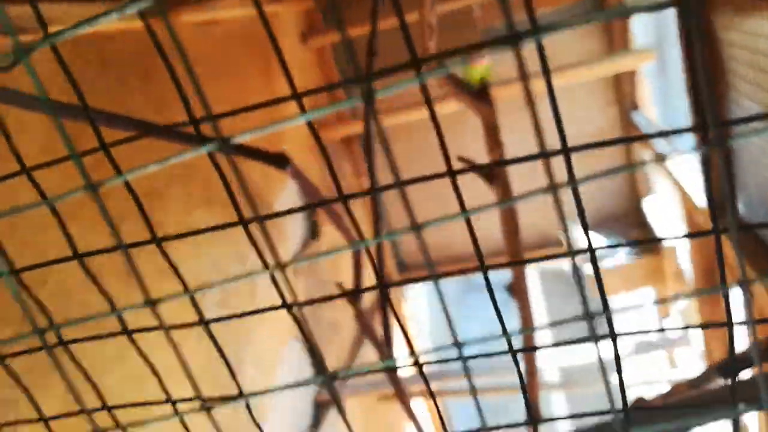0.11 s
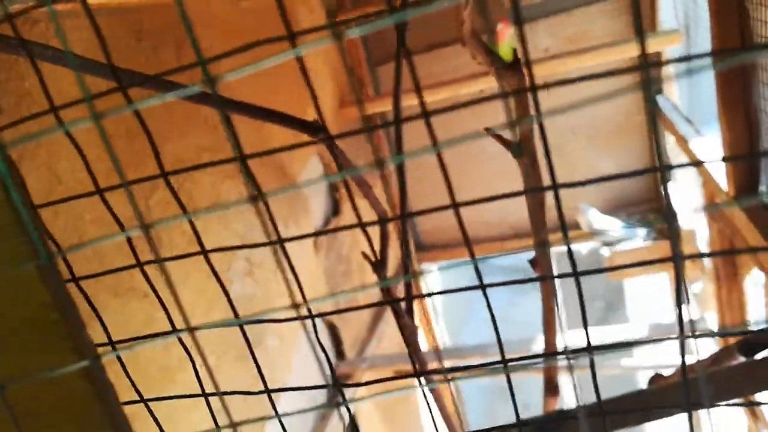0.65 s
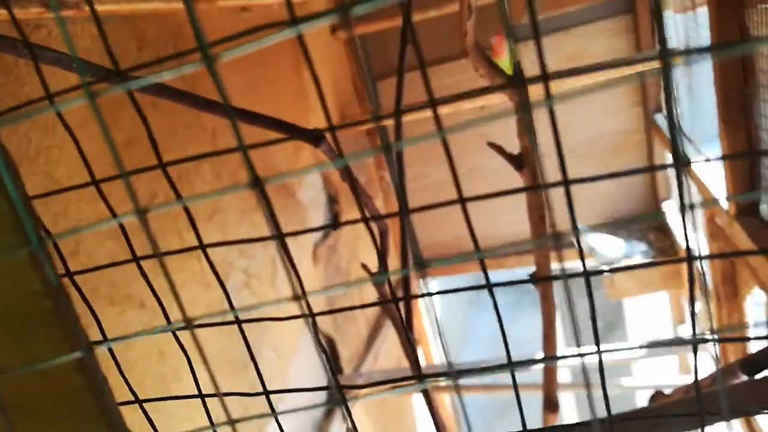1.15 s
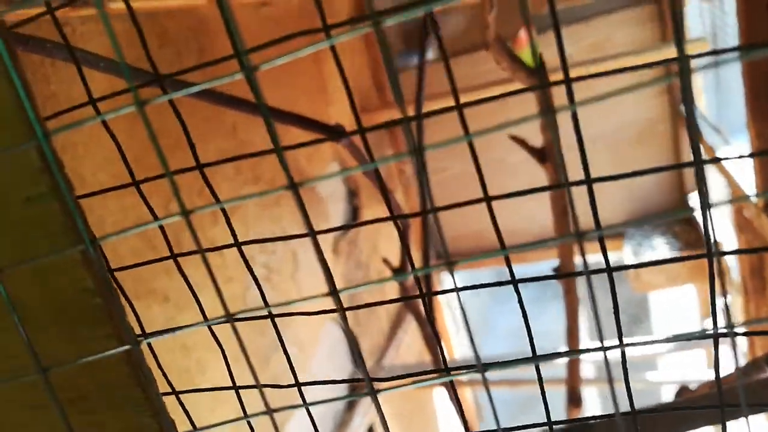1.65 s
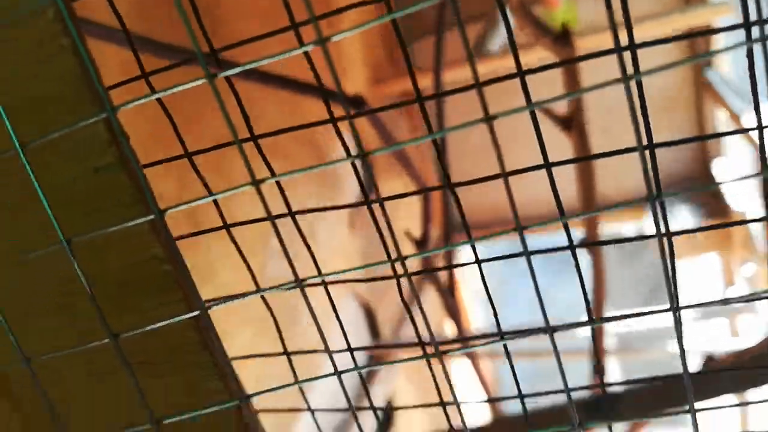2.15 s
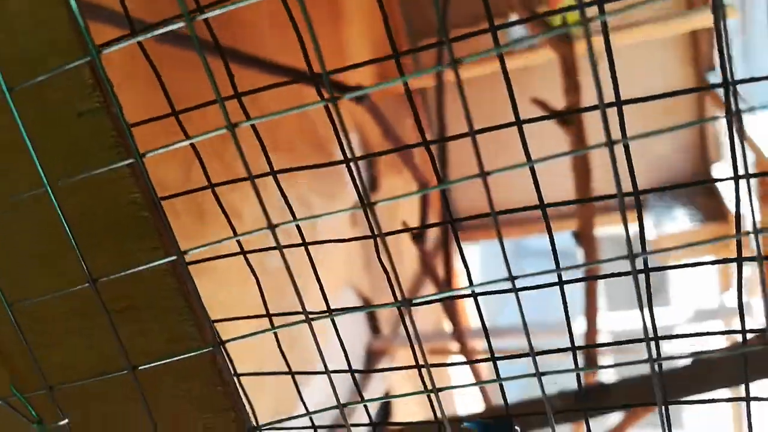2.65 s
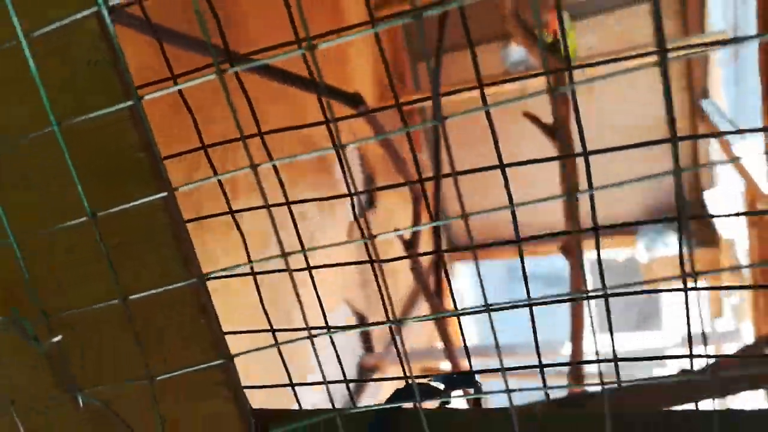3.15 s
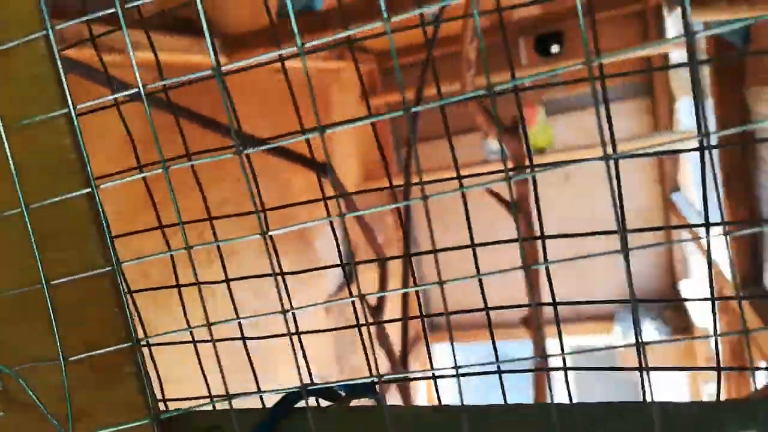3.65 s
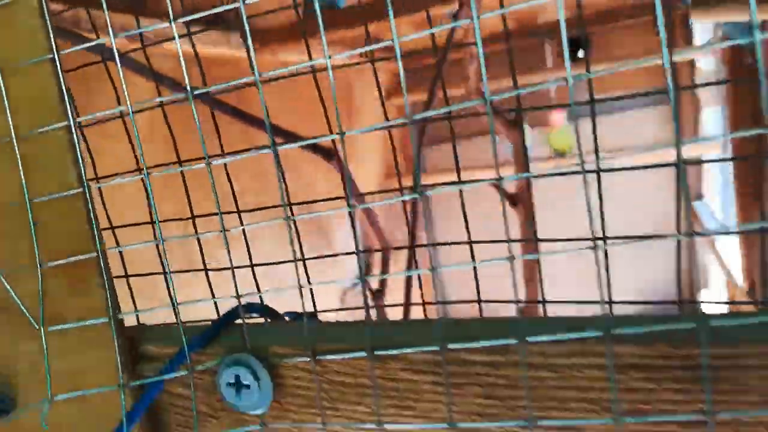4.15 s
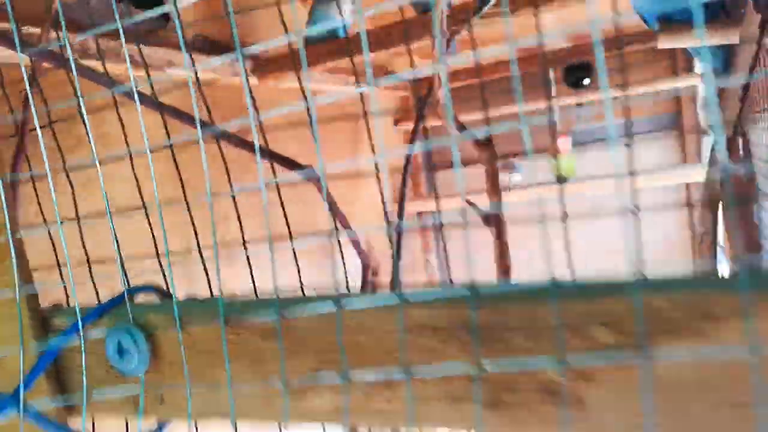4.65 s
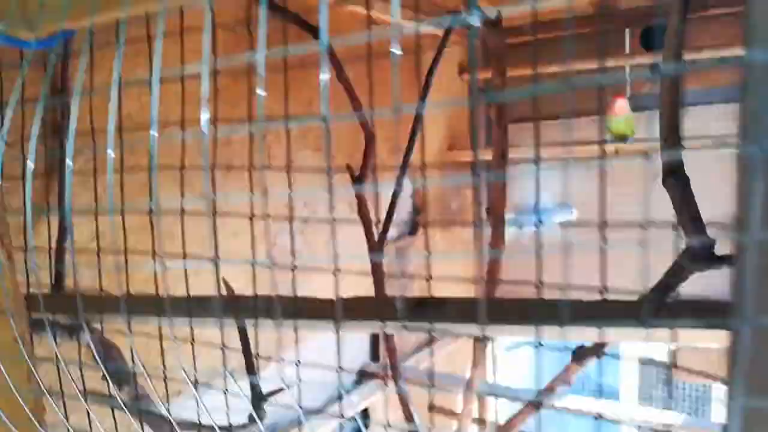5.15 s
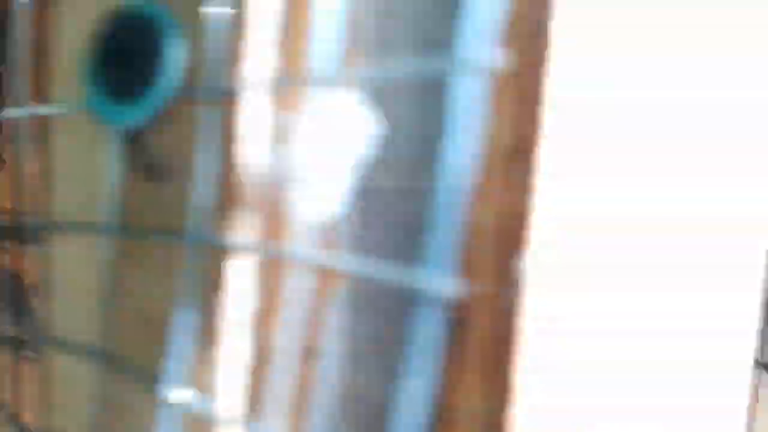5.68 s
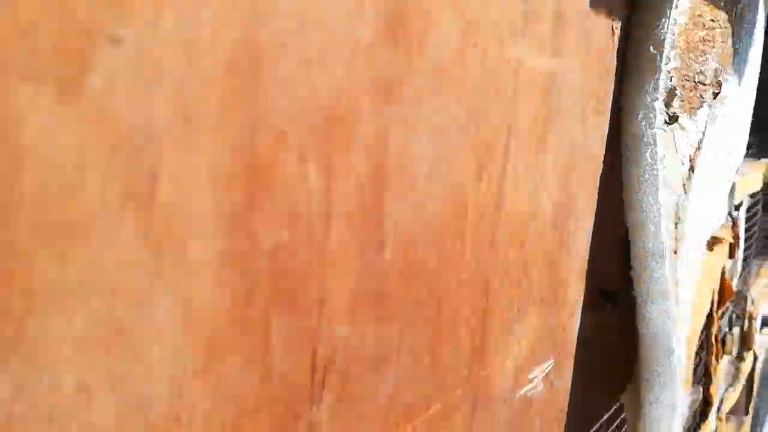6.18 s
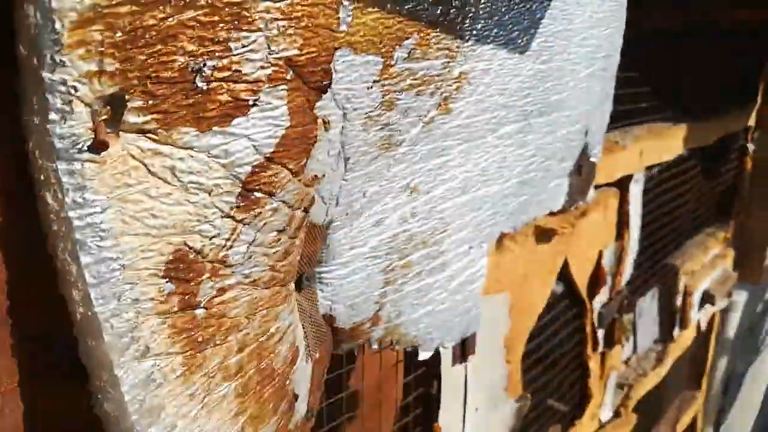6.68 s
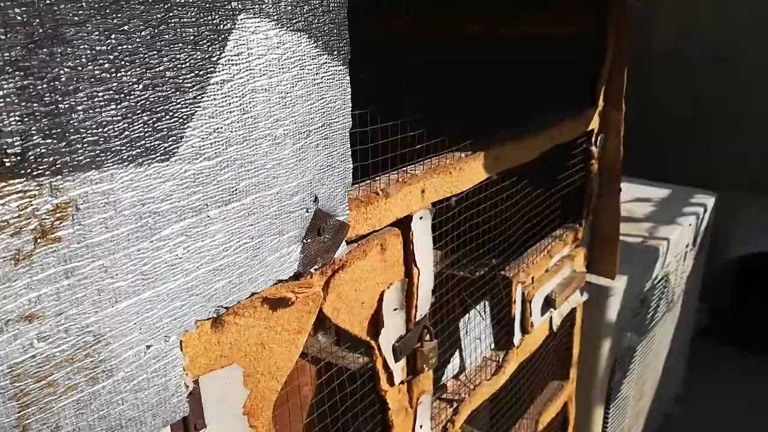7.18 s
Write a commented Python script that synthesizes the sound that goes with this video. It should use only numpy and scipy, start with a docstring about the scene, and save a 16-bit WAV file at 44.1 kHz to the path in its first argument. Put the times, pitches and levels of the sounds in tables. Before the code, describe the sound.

A quiet wood and wire aviary heard through a close hand-held stereo microphone. At 0 s wire mesh jingles briefly under cloth rustle, with a sharp tick. Light clicks and knocks come at 0.4 s; a lively cluster of hard, bright claw ticks, mostly left, runs from 1.0 to 1.3 s, with a low bump. At 1.5 s a loud squeaky parrot chirp flicks up into a piercing high note; a weaker squeak and another chirp follow by 1.8 s. From 2 to 3.5 s it is sparse: faint thin whistles near 2.4 s, small ticks, a finger rub left. Hand rustle and wood scraping swell from 4 to 5.3 s, with a knock at 4.5 s. Chirps return left at 5.25 and 5.4 s, then nearer centre at 5.75 and 5.95 s, the last shrillest. Short echoes fade; a knock at 6.4 s, a soft hiss, tiny ticks and near quiet until 7.3 s.

```python
"""A wood and wire aviary: small parrots chirp close to a hand-held camera with two spaced microphones.
Chirps are sums of fluttering harmonics shaped by a throat response; struck wires are decaying modes.
Claws and fingers tick as short filtered noise, and wood knocks as decaying sines. Cloth, wood, skin, the
quiet yard and low bumps of the hand are coloured noise; hums and distant whistles are narrow bands.
Calls, ticks, knocks and wires also excite sparse echoes from boards and boxes."""
import sys
import numpy as np
from scipy import signal
from scipy.io import wavfile
from scipy.ndimage import uniform_filter1d

SR = 44100
rng = np.random.default_rng(int(sys.argv[2]) if len(sys.argv) > 2 else 0)


def output_pcm(signal):
    """Save a mono or channel-first signal as 16-bit PCM at the path in sys.argv[1].

    Samples are clipped to [-1, 1] before scaling.
    """
    pcm = np.clip(np.atleast_2d(signal).T, -1, 1) * 32767
    wavfile.write(sys.argv[1], SR, np.round(pcm).astype(np.int16))


def nominal_scale(level):
    """Amplitude ratio for a level in decibels (scalar or array-like)."""
    x = np.asarray(level, float) / 20
    return 10 ** x


N = 321930

# Short syrinx notes, often two at once from its two sides: (t/s, length/s, initial f/Hz, target f/Hz, effort/dB)
SHORT_NOTES = [(1.53, 0.031, 7070, 6950, -10), (1.531, 0.026, 5020, 5860, -14),
               (1.548, .042, 3520, 3830, -26.5), (1.723, .02, 3507, 3720, -19.5),
               (1.738, 0.035, 1976, 1993, -25), (1.81, .011, 6810, 6710, -12),
               (1.821, 0.021, 6375, 6930, -8.5), (1.807, 0.015, 4560, 5850, -22),
               (5.291, .018, 5240, 5466, -11), (5.306, .013, 5400, 6000, -10),
               (5.309, 0.022, 7020, 6800, -22), (5.381, 0.011, 1970, 1960, -28),
               (5.408, .012, 4726, 5170, -9.5), (5.411, 0.026, 6760, 6310, -11.5),
               (5.799, .029, 6830, 6780, -11), (5.807, 0.042, 4980, 5860, -19),
               (5.921, 0.024, 2600, 2730, -20.5), (5.988, 0.029, 6740, 6710, -2.5),
               (5.989, .032, 2953, 2935, -28.5), (6.015, .024, 3000, 3630, -28)]
# Long squeak of each chirp, a list of points: (t/s, f/Hz, effort/dB, roughness/1)
SQUEAK_CONTOURS = [
    [(1.4755, 2030, -24.5, .6), (1.482, 2060, -13, .6), (1.492, 2130, -13, .7), (1.503, 2170, -10.5, .05),
     (1.52, 2283, -6, 0.05), (1.532, 2325, -12, 0)],
    [(1.672, 1600, -35, .5), (1.681, 1743, -27.5, .3), (1.695, 1785, -31.5, .15), (1.705, 1800, -26, .3),
     (1.716, 1690, -46, .4)],
    [(1.759, 2365, -19, .5), (1.765, 2412, -15, 0.1), (1.772, 2077, -11.5, .05), (1.782, 2190, -12.5, .05),
     (1.792, 2260, -19, 0), (1.805, 2330, -14.5, .05), (1.817, 2343, -15, 0)],
    [(5.251, 2088, -27.5, .9), (5.259, 2490, -19.5, .4), (5.267, 2420, -16, .3), (5.276, 2207, -17, .05),
     (5.287, 2337, -16.5, .05), (5.298, 2337, -25, 0)],
    [(5.381, 2658, -31, .2), (5.39, 2642, -19.5, 0), (5.402, 2713, -16, 0), (5.409, 2760, -21.5, .05),
     (5.417, 3070, -33.5, .1)],
    [(5.736, 1930, -29, .4), (5.744, 2038, -17.5, 0.1), (5.756, 2030, -10.5, 0.01),
     (5.768, 2170, -15.5, .05), (5.782, 2203, -16.5, 0.11), (5.792, 2282, -15.5, .05),
     (5.802, 2390, -18, .2)],
    [(5.919, 2054, -28, .6), (5.933, 2220, -19.5, .2), (5.945, 2320, -11, .05), (5.958, 2380, -12.5, 0),
     (5.97, 2310, -13.5, .05), (5.98, 2240, -12.5, .05), (5.988, 2160, -23.5, .05)],
]
# Seat of the bird of each chirp: (from t/s, left minus right level/dB)
PERCH_SIDES = [(1.47, 0.5), (1.66, 5.5), (5.24, 12.5), (5.37, 9), (5.72, 4.5), (5.9, 2.5)]
# Throat response, before the harmonics are normalised: (f/Hz, level/dB)
THROAT_RESPONSE = [(1700, -15), (2300, -16.5), (2800, -8), (3700, -10), (5000, -6), (6700, 2),
                   (7600, -11.5), (9000, -14.5), (10100, -26), (11500, -22), (14000, -38)]
# Decay of the echoes off boards and boxes: (f/Hz, t60/s)
ECHO_DECAY = [(1500, 0.081), (2500, 0.24), (4500, 0.14), (6800, 0.17), (9000, 0.11), (13000, 0.12)]
# Ticks of claws and fingers: (t/s, peak level/dB, ring f/Hz, left minus right level/dB, t60/s)
TICK_EVENTS = [(0.0585, -15.5, 7000, -3.5, .048), (.4043, -34.5, 4500, 7.5, .015),
               (.4154, -33, 4570, 1.5, .024), (0.5177, -40.5, 2400, 7.5, .009),
               (.9773, -25.5, 1310, 5.5, .049), (0.9871, -11, 5300, 9.5, .028),
               (1.0162, -21.5, 6900, 4.5, .012), (1.04, -13.5, 3750, 7, .021),
               (1.071, -32, 3580, -1.5, .016), (1.1161, -23.5, 5970, 7, .033), (1.1354, -29, 6200, 4, .026),
               (1.2407, -37, 3010, 3.5, .035), (1.262, -31.5, 5820, 5.5, .037),
               (1.4488, -37, 4340, 9, .026), (2.296, -29.5, 4230, 7, .007), (2.344, -41.5, 6900, 6, .02),
               (2.4196, -37.5, 6590, -0.5, .007), (2.4746, -42, 5500, -0.5, .007),
               (3.056, -35.5, 4980, 0, .007), (3.0991, -27.5, 6000, -1.5, .007),
               (3.1864, -27.5, 1270, 13.5, .005), (3.244, -28.5, 5550, -0.5, .007),
               (3.4775, -43.5, 1040, -10, .02), (3.599, -26, 7700, 20, .006), (3.628, -35.5, 1110, 0, .007),
               (3.7197, -37.5, 1096, -6.5, .004), (4.4689, -25.5, 1210, 1.5, .012),
               (4.596, -24.5, 5750, -2.5, .007), (5.538, -47, 7800, 0, 0.0055),
               (5.5645, -34.5, 6390, 4, .007), (5.609, -40, 7800, 0.5, .006),
               (5.669, -40.5, 7800, -3.5, .006), (5.703, -38, 7800, -3.5, .006),
               (5.915, -38, 7770, 1, .006), (5.6355, -37, 5750, -13.5, .007),
               (6.3024, -35, 6430, 8.5, .006), (6.4156, -27, 1330, 6.5, .007),
               (6.7312, -36, 7140, 6.5, .025), (6.8059, -35, 4050, -1.5, .014),
               (6.9352, -40.5, 7060, 2.5, .019), (7.0766, -40.5, 1220, 20.5, .024),
               (7.113, -41.5, 3520, 4.5, .007), (7.14, -45.5, 700, 6, .015),
               (7.2579, -45.5, 1272, -12.5, .022)]
# Modes of three wire panels, by name; mesh() caps the decay at 0.2 s: (f/Hz, level/dB, t60/s)
PANEL_MODES = {"thin": [(5190, -.1, 0.25)], "stiff": [(2654, 2.5, 0.15), (3500, -3.5, 0.15),
               (4230, -19, 0.09), (6740, -11.5, 0.06)], "loose": [(1330, -7, 0.11), (1586, 0.5, 0.1),
               (1910, -8, 0.11), (2610, 2, 0.04), (3000, -8, 0.061), (3150, 6.5, 0.052), (3580, 2, 0.058),
               (4360, -10, 0.073), (5750, -22, .025), (6780, 5, 0.057), (7650, 4.5, 0.06),
               (8340, -6.5, 0.027), (8314, -4.5, 0.037)]}
# Birds shake the mesh: (t/s, panel, 1/e time of shaking/s, level/dB, left minus right level/dB)
MESH_SHAKES = [(.001, "thin", 0.0031, -39, -3), (0.024, "stiff", 0.0099, -32.5, -9.5),
               (.059, "loose", 0.033, -36.5, -0.5), (0.097, "loose", 0.039, -35.5, -1),
               (0.128, "loose", 0.045, -47, 1)]
# Relative spectrum of the hiss of cloth: (f/Hz, level per Hz/dB)
CLOTH_SPECTRUM = [(1180, -14), (2000, -10), (2570, -5.5), (5350, -1), (6880, -2), (8190, -4), (10300, -17),
                  (14500, -26), (16000, -40)]
# Relative spectrum of the scrape of wood: (f/Hz, level per Hz/dB)
WOOD_SPECTRUM = [(180, -16.5), (300, 1.5), (455, -9), (539, -2.5), (599, 1.5), (959, -1), (2500, -10.5),
                 (3250, -38.5), (5500, -120)]
# Relative spectrum of the camera body under the hand: (f/Hz, level per Hz/dB)
BODY_SPECTRUM = [(12, -37), (20, -4.5), (60, 5), (92, -4.5), (123, -0.5), (206, -7.5), (252, -7),
                 (400, -27), (520, -54), (880, -120)]
# Relative spectrum of the quiet yard: (f/Hz, level per Hz/dB)
YARD_SPECTRUM = [(180, -30), (300, -2), (511, -5), (900, -2), (2400, -9), (6740, -6.5), (8090, -12.5),
                 (10400, -24), (14700, -26), (16000, -32.5)]
# Diffuse sound at the two microphones: (f/Hz, likeness/1)
COHERENCE = [(60, 0.99), (130, 1), (290, 0.55), (640, -0.49), (1410, -0.07), (3100, 0.0038), (6820, 0.0018),
             (15000, 0.14)]
# A finger rubs the casing by the left microphone: (full from t/s, until t/s, level/dB, left minus right level/dB)
FINGER_RUBS = [(3.206, 3.217, -52, 17), (3.321, 3.369, -44.5, 20.5), (7.002, 7.078, -57.5, 10.5)]
# Relative spectrum of skin on the casing: (f/Hz, level per Hz/dB)
SKIN_SPECTRUM = [(290, -50.5), (500, -27), (974, -3), (1210, -1.5), (1600, -0.5), (2460, -9.5), (3020, -6),
                 (4470, -11), (7000, -6.5), (16000, -39)]
# Swells of each of two hums over its resting level: (full from t/s, until t/s, level/dB)
HUM_SWELLS = [
    [(.0, .03, -55), (.6, .85, -59.5), (1.33, 1.38, -53.5), (1.65, 2.6, -58.5), (3.08, 3.18, -51),
     (3.7, 3.92, -48), (4.55, 4.9, -64), (5.2, 5.4, -50)],
    [(1.25, 1.4, -52.5), (3.58, 3.93, -51.5), (4.4, 4.9, -59), (5.3, 5.45, -51.5), (6.6, 7.2, -62.5)],
]
# Bands of the two hums: (centre f/Hz, width/Hz)
HUM_BANDS = [(75, 2.7), (125, 8.8)]
# Resting level of each hum: level/dB
HUM_REST = [-66, -78]
# Tones and whistles from far off: (start t/s, end t/s, f/Hz, width/Hz, peak level of the steady core/dB)
DISTANT_TONES = [(.001, 0.42, 239.5, 9.3, -60.5), (.05, 0.18, 564, 17, -64.5),
                 (1.127, 1.194, 1400, 26, -61), (2.21, 2.295, 1370, 39, -62), (2.23, 2.29, 3130, 67, -58),
                 (2.355, 2.413, 3140, 30, -50), (2.355, 2.475, 4860, 57, -55.5),
                 (2.37, 2.434, 5700, 40, -61), (6.044, 6.063, 2650, 60, -36),
                 (6.14, 6.437, 1630, 40, -69.5), (6.779, 7.3, 1238, 50, -70.5)]
# Dull knocks on wood: (t/s, peak level/dB, f/Hz)
WOOD_KNOCKS = [(0.4048, -36, 265), (0.4162, -35.5, 260), (.98, -35, 830), (1.0177, -33.5, 253),
               (1.1165, -38, 262), (1.262, -34, 834), (1.4481, -37, 760), (3.614, -40, 270),
               (4.061, -36.5, 201), (4.4676, -27.5, 260), (4.595, -43, 260), (6.4153, -33.5, 277)]
# Hands and cloth move: (full from t/s, until t/s, level/dB, weight on the wood/dB, left minus right level/dB)
HAND_MOVES = [(.0, 0.11, -39, -9, -2), (0.392, 0.429, -52.5, -5.5, 1), (0.52, 0.69, -46.5, -5.5, 4),
              (0.871, 0.918, -52.5, -8, 0), (1.003, 1.033, -52.5, 3.5, 4.5), (1.13, 1.122, -59, 10.5, 5),
              (1.264, 1.302, -49.5, -1, 0.5), (1.337, 1.35, -47, -6.5, 1.5), (1.477, 1.534, -53, 4, 3),
              (1.757, 1.8, -60.5, 4.5, -1), (2.11, 2.124, -58, -4, 2.5), (2.253, 2.33, -56.5, 0.5, 2),
              (2.377, 2.462, -55, -10.5, -0.5), (2.564, 2.57, -57.5, -2.5, 0), (2.69, 2.7, -68, -9, -7),
              (2.895, 3.112, -52.5, -1, -0.5), (3.178, 3.37, -55.5, 0, -2), (3.464, 3.582, -55.5, 2, 2.5),
              (3.588, 4.01, -48.5, -2, 0), (4.042, 4.436, -39, -1, -0.5), (4.442, 4.577, -45, 1, -1),
              (4.606, 4.929, -43, -1.5, 2), (4.974, 5.267, -42, -5.5, 3), (5.315, 5.672, -52.5, -4.5, -1),
              (5.705, 5.72, -44.5, -4, -3), (5.856, 5.923, -46.5, -12.5, -1.5), (6.034, 6.07, -46, -4, 1),
              (6.141, 6.4, -57.5, -7, -1.5), (6.453, 6.627, -44, -26.5, 0.5),
              (6.65, 6.688, -51.5, -27, 1.5), (7.027, 7.067, -68.5, 15.5, 10), (7.167, 7.2, -57, -14, 6.5)]
# The hand bumps the camera body: (full from t/s, until t/s, level/dB)
BODY_BUMPS = [(0.066, 0.16, -48.5), (0.41, 0.456, -48.5), (1.279, 1.335, -36), (1.472, 1.537, -46),
              (1.748, 1.8, -56.5), (2.556, 2.584, -55), (2.946, 3.254, -53.5), (4.036, 4.08, -45),
              (4.12, 4.54, -48), (4.777, 4.802, -45), (5.033, 5.065, -52), (5.2, 5.25, -38.5),
              (5.303, 5.393, -53), (5.515, 5.527, -45), (5.711, 5.757, -45.5), (6.398, 6.436, -55),
              (6.558, 6.585, -55.5)]

SPACING = 27  # samples between the microphones for sound from the side
YARD_DB = -61
MOVE_RISE_DB_PER_S, MOVE_FALL_DB_PER_S = 255, 260
BUMP_DB_PER_S = 298.5
GRIP_DB, GRIP_FADES_DB_PER_S = -56, 0.5  # the steady grip rumbles a little, less and less
RUB_RISE_DB_PER_S, RUB_FALL_DB_PER_S = 308, 700
HUM_DB_PER_S = 64.5
KNOCK_T60_S = .035
FAINT_TICKS, FAINT_DB, FAINT_SPREAD_DB = 50, -57, 3  # small claw ticks at random moments
FAINT_LOW_HZ, FAINT_HIGH_HZ = 3000, 7500
ECHO_ABOVE_HZ = 3200  # the boards throw back less of the low partials of calls
RISE_S, START_DB, FADE_DB = 0.0085, -2.5, -17  # a short note swells, then dies
GLIDE = .4  # time constant of the pitch, as a share of the note's length
RASP, RASP_S, RASP_REST = .6, 0.0045, .05  # a short note starts rough and clears
SQUEAK_BASE_DB, NOTE_BASE_DB = -1, 4.5  # lift of the lowest partial
BASE_DB_PER_KHZ = 14  # further lift in squeaks of mean pitch above 2150 Hz


def evened(x):
    """Normalisation: scales a signal to unit rms."""
    return x / np.sqrt(np.mean(abs(x) ** 2) + 1e-20)


def read(points, hz):
    """Logarithmic interpolation: reads a spectrum on a log-frequency axis."""
    f, value = np.transpose(points)
    return np.interp(np.log(hz + 1), np.log(f + 1), value)


def lowpass(x, order, hz):
    """Low-pass filtering: keeps the slow part of a fluctuation."""
    return signal.sosfilt(signal.butter(order, hz, fs=SR, output="sos"), x)


def bandpass(x, order, band):
    """Band-pass filtering: keeps the part between two frequencies in Hz."""
    return signal.sosfilt(signal.butter(order, band, "bandpass", fs=SR, output="sos"), x)


def add(mix, s, sound, pan_db):
    """Interaural cues: level and delay place one or two channels; the far microphone hears later."""
    late = round(SPACING * np.clip(pan_db / 6, -1, 1))
    pair = sound * np.ones((2, 1))
    for side, sign in enumerate((1, -1)):
        start = round(s * SR) + max(-sign * late, 0)
        part = mix[side, start:][:pair.shape[1]]
        part += nominal_scale(sign * pan_db / 2) * pair[side, :len(part)]


def swells(start, end, level_db, rise, fall):
    """Exponential envelopes: the power of each event climbs, holds and sinks at set dB per second."""
    s = np.arange(0, N / SR + .01, .002)
    before_db = (start[:, None] - s) * rise
    after_db = (s - end[:, None]) * fall
    short_db = np.maximum(before_db, after_db).clip(0)
    return s, nominal_scale(level_db[:, None] - short_db) ** 2 + 1e-14


def summed(power, pan_db):
    """Energy addition: total level, and the side of the events weighted by their power."""
    total = power.sum(0)
    return 10 * np.log10(total), (power * pan_db[:, None]).sum(0) / total


def noise(colour, s, level_db, pan_db, size, patchy_db, flicker_db):
    """Spatial coherence: random short-time spectra, alike but delayed at the far microphone when from one side."""
    hop = size // 4
    frames, hz = N // hop + 5, np.fft.rfftfreq(size, 1 / SR)
    a, b, c, d, patches = rng.standard_normal((frames, len(hz), 5)).T
    patches = uniform_filter1d(patches, size // 64 + 1, 0)  # smooth over frequency, then time
    patches = evened(uniform_filter1d(patches, 4096 // size + 1, 1))
    flicker = np.minimum(rng.exponential(1, frames), 3.)  # level changes across the whole band
    pan = np.interp(np.arange(frames) * hop / SR, s, pan_db)
    aside = np.clip(pan / 14, -.9, .9)
    late = np.exp(-2j * np.pi * np.outer(hz, np.sign(aside)) * SPACING / SR)
    diffuse = np.clip(read(COHERENCE, hz), -1, 1)[:, None]
    same = (1 - abs(aside)) * diffuse + abs(aside) * late
    left = a + 1j * b
    right = same * left + np.sqrt(1 - abs(same) ** 2) * (c + 1j * d)
    spectra = np.array([left, right])
    spectra *= nominal_scale(read(colour, hz)[:, None] + patchy_db * patches + flicker_db * flicker)
    t = np.arange(N) / SR
    level = np.interp(t, s, level_db) + np.outer([.5, -.5], np.interp(t, s, pan_db))
    return nominal_scale(level) * evened(signal.istft(spectra, nperseg=size, noverlap=size - hop)[1][:, :N])


def rustle():
    """Friction noise: each move makes cloth hiss and, by its weight, wood scrape."""
    start, end, db, weight_db, pan_db = np.transpose(HAND_MOVES)
    s, power = swells(start, end, db, MOVE_RISE_DB_PER_S, MOVE_FALL_DB_PER_S)
    hiss = noise(CLOTH_SPECTRUM, s, *summed(power, pan_db), size=256, patchy_db=2.0, flicker_db=1.0)
    pressed = power * nominal_scale(weight_db)[:, None] ** 2
    scrape = noise(WOOD_SPECTRUM, s, *summed(pressed, pan_db), size=512, patchy_db=2.5, flicker_db=2.0)
    return hiss + scrape


def hand_rumble():
    """Structure-borne sound: the grip and bumps of the hand drive low noise through the camera body."""
    s, bumps = swells(*np.transpose(BODY_BUMPS), BUMP_DB_PER_S, BUMP_DB_PER_S)
    grip = nominal_scale(GRIP_DB - GRIP_FADES_DB_PER_S * s) ** 2
    level_db = 10 * np.log10(bumps.sum(0) + grip)
    return noise(BODY_SPECTRUM, s, level_db, 0 * s, size=4096, patchy_db=0.47, flicker_db=1.3)


def yard():
    """Diffuse field: steady coloured noise whose level flickers from frame to frame."""
    s = np.array([0, N / SR])
    return noise(YARD_SPECTRUM, s, YARD_DB + 0 * s, 0 * s, size=1024, patchy_db=3.0, flicker_db=-5.5)


def hums():
    """Narrow-band noise: two swelling hums, alike in both microphones."""
    t, out = np.arange(N) / SR, 0
    grains = rng.standard_normal((2, N))
    for (hz, width), rows, rest_db, grain in zip(HUM_BANDS, HUM_SWELLS, HUM_REST, grains):
        s, power = swells(*np.transpose(rows), HUM_DB_PER_S, HUM_DB_PER_S)
        level = np.sqrt(power.sum(0) + nominal_scale(rest_db) ** 2)
        hum = evened(bandpass(grain, 1, [hz - width / 2, hz + width / 2]))
        out = out + np.interp(t, s, level) * hum
    return out


def tones():
    """Line broadening: whistles and drones, a steady core in narrow-band fuzz, fade in and out."""
    out = np.zeros((2, N))
    for s, end, hz, width, db in DISTANT_TONES:
        fuzz = evened(bandpass(rng.standard_normal(SR), 1, [hz - width / 2, hz + width / 2]))
        fuzz = fuzz[SR // 4:][:round((end - s) * SR)]
        core = np.sin(2 * np.pi * hz * np.arange(len(fuzz)) / SR)
        tone = 0.88 * fuzz + core
        add(out, s, nominal_scale(db) * tone * signal.windows.tukey(len(fuzz), .3), 1.5)
    return out


def mesh(rattle_hz=80, rattles_after_s=.08):
    """Modal excitation: small knocks ring a wire panel; longer shaking rattles it and blurs its tones."""
    out, t = np.zeros((2, N)), np.arange(12000) / SR
    for s, panel, lasts, db, pan_db in MESH_SHAKES:
        knocks = rng.standard_normal(len(t)) ** 2 * rng.choice([-1, 1], len(t))
        knocks *= np.exp(-(t / lasts) ** 2)
        ring = sum(nominal_scale(mode_db - 60 * t / min(t60, .2)) * np.sin(2 * np.pi * hz * t)
                   for hz, mode_db, t60 in PANEL_MODES[panel])
        rattle = evened(lowpass(rng.standard_normal(len(t)), 2, rattle_hz))
        share = np.clip(lasts / rattles_after_s, 0, .9)
        sound = signal.fftconvolve(knocks, ring)[:len(t)]
        sound = sound * (np.sqrt(1 - share) + np.sqrt(share) * rattle)
        add(out, s, nominal_scale(db) * sound / np.std(sound[:2500]), pan_db)
    return out


def aviary(x, gap=90):
    """Reverberation: sparse echoes of random sign off boards and boxes, each band with its own decay."""
    taps = np.zeros((2, SR // 2))
    slots = np.arange(gap, SR // 2 - 24, 24)  # one echo in every 24 samples
    at = slots + rng.integers(0, 24, (2, len(slots)))
    np.put_along_axis(taps, at, rng.choice([-1., 1.], at.shape), 1)
    hz, t, z = signal.stft(taps, SR, nperseg=128)
    decay = nominal_scale(-60 * t / read(ECHO_DECAY, hz)[:, None])
    tail = signal.istft(z * decay, SR, nperseg=128)[1]
    return signal.fftconvolve(x.mean(0)[None], tail / np.linalg.norm(tail[0]), axes=1)[:, :N]


def faint_ticks():
    """Random point process: rows like the listed ticks, scattered by chance."""
    when, size, pitch, side = rng.random((FAINT_TICKS, 4)).T
    db = FAINT_DB - FAINT_SPREAD_DB * np.log(1 - .95 * size)
    hz = FAINT_LOW_HZ + (FAINT_HIGH_HZ - FAINT_LOW_HZ) * pitch
    return np.transpose([when * N / SR, db, hz, 16 * (side - .4), .006 + 0 * when])


def ticks(ring=1.0, air=0.35):
    """Impact transient: a snap of noise round its own pitch with a short resonant ring."""
    rows = [*TICK_EVENTS, *faint_ticks()]
    out, t = np.zeros((2, N)), np.arange(3000) / SR
    for (s, db, hz, pan_db, t60), grain in zip(rows, rng.standard_normal((len(rows), 3000))):
        snap = bandpass(grain, 3, [.45 * hz, min(2.45 * hz, 9500)])
        r = np.exp(-np.pi * .12 * hz / SR)  # pole radius for a bandwidth of 0.12 f
        tuned = signal.lfilter([1], [1, -2 * r * np.cos(2 * np.pi * hz / SR), r * r], grain)
        envelope = (1 - np.exp(-t / (0.079 * t60))) * nominal_scale(-60 * t / max(t60, .003))
        tick = (evened(snap) + ring * evened(tuned) + air * grain) * envelope
        add(out, max(s - .001, 0), nominal_scale(db) * tick / abs(tick).max(), pan_db)
    return out


def knocks():
    """Damped oscillation: one dying low tone of the wood."""
    out, t = np.zeros((2, N)), np.arange(3000) / SR
    for s, db, hz in WOOD_KNOCKS:
        add(out, s - .001, np.sin(2 * np.pi * hz * t) * nominal_scale(db - 60 * t / KNOCK_T60_S), .5)
    return out


def note(t, hz, level_db, rough, base_db, wobble=.007, flutter_hz=230, flutter=.2, rasp_hz=640):
    """Source and filter: throat-shaped syrinx harmonics flutter, and roughness turns lines into rasp."""
    k = np.arange(1, 9)[:, None]
    a, b, c, d = rng.standard_normal((len(t) + 600, 8, 4)).T
    grain = np.array([a + 1j * b, c + 1j * d])  # near boards scatter differently to each microphone
    slow = evened(lowpass(grain, 4, flutter_hz)[..., 600:])
    fast = evened(lowpass(grain, 4, rasp_hz)[..., 600:])
    turns = np.cumsum(hz * (1 + wobble * slow[0, 7].real)) / SR
    weight = nominal_scale(read(THROAT_RESPONSE, k * hz) + base_db * (k == 1)) * (k * hz < 16000)
    weight /= np.sqrt((weight ** 2).sum(0))
    reach = np.clip(k * hz / 4400, .5, 1) ** 2  # low partials stay cleaner
    fray = np.clip((k * hz - 7500) / 2500, 0, .4)  # those above 7.5 kHz fray
    rough = np.clip(rough * reach + fray, 0, 1)
    flutter = flutter * reach
    steady = np.sqrt(1 - flutter) + np.sqrt(flutter) * slow
    fold = np.sqrt(1 - rough) * steady + np.sqrt(rough) * fast
    tone = (weight * fold * np.exp(2j * np.pi * k * turns)).real.sum(1)
    return np.sqrt(2) * nominal_scale(level_db) * tone * signal.windows.tukey(len(t), .1)


def birds():
    """Voiced phonation: squeaks follow pitch contours and short notes glide, each chirp from its perch."""
    out = np.zeros((2, N))
    since, side_db = np.transpose(PERCH_SIDES)
    for s, *controls in map(np.transpose, SQUEAK_CONTOURS):
        t = np.arange(s[0], s[-1], 1 / SR)
        hz, level_db, rough = (np.interp(t, s, c) for c in controls)
        base_db = SQUEAK_BASE_DB + BASE_DB_PER_KHZ * max(controls[0].mean() - 2150, 0) / 1000
        add(out, s[0], note(t, hz, level_db, rough, base_db), side_db[since < s[0]][-1])
    for s, length, from_hz, to_hz, db in SHORT_NOTES:
        t = np.arange(0, length, 1 / SR)
        hz = to_hz + (from_hz - to_hz) * np.exp(-t / (GLIDE * length))
        level_db = db + START_DB * np.clip(1 - t / RISE_S, 0, 1) + FADE_DB * (t / length) ** 3
        rough = RASP_REST + RASP * np.exp(-t / RASP_S)
        add(out, s, note(t, hz, level_db, rough, NOTE_BASE_DB), side_db[since < s][-1])
    return out


def rubs():
    """Sliding friction: skin drags over the casing and stops short."""
    start, end, db, pan_db = np.transpose(FINGER_RUBS)
    s, power = swells(start, end, db, RUB_RISE_DB_PER_S, RUB_FALL_DB_PER_S)
    return noise(SKIN_SPECTRUM, s, *summed(power, pan_db), size=256, patchy_db=1.0, flicker_db=2.5)


def scene():
    """Superposition: direct sounds and their echoes add to the rustle, rumble, yard and tones."""
    calls, near = birds(), ticks() + knocks() + mesh()
    highpass = signal.butter(2, ECHO_ABOVE_HZ, "highpass", fs=SR, output="sos")
    thrown = signal.sosfilt(highpass, calls)
    echoes = nominal_scale(-8.5) * aviary(thrown) + nominal_scale(-12.5) * aviary(near)
    handling = rustle() + hand_rumble() + rubs()
    return calls + near + echoes + handling + yard() + hums() + tones()


def roll_off(x):
    """The treble ends steeply here."""
    return signal.sosfilt(signal.butter(12, 16470, fs=SR, output="sos"), x)


def record(dry):
    """Saturation: the microphone stage rounds off the loudest peaks."""
    mix = 1.41 * np.tanh(dry / 1.404)
    return roll_off(mix)


dry = scene()
out = record(dry)
output_pcm(out)
```